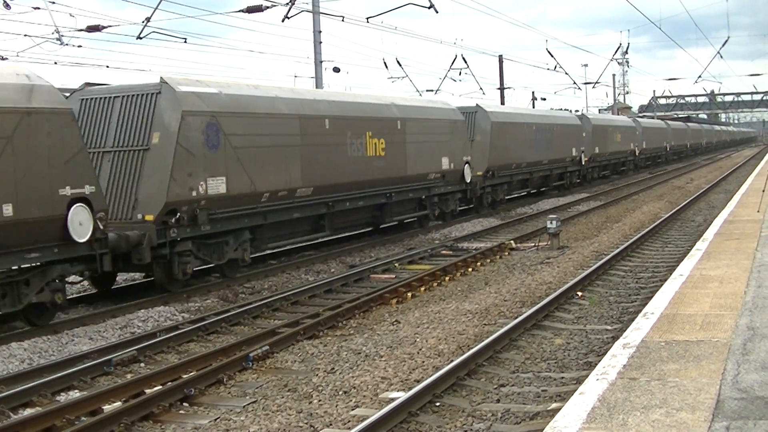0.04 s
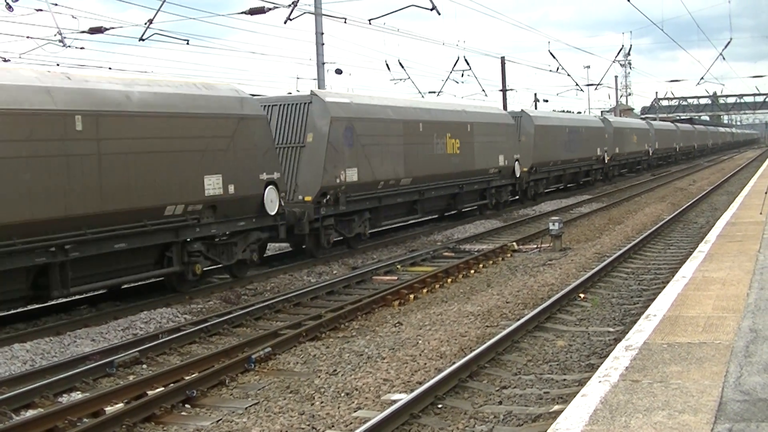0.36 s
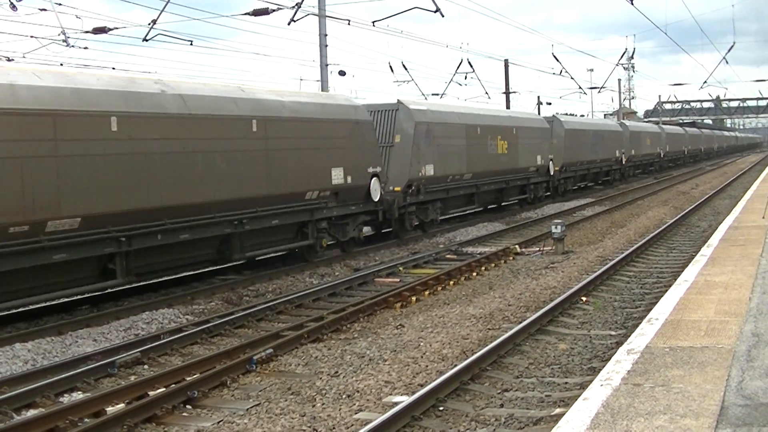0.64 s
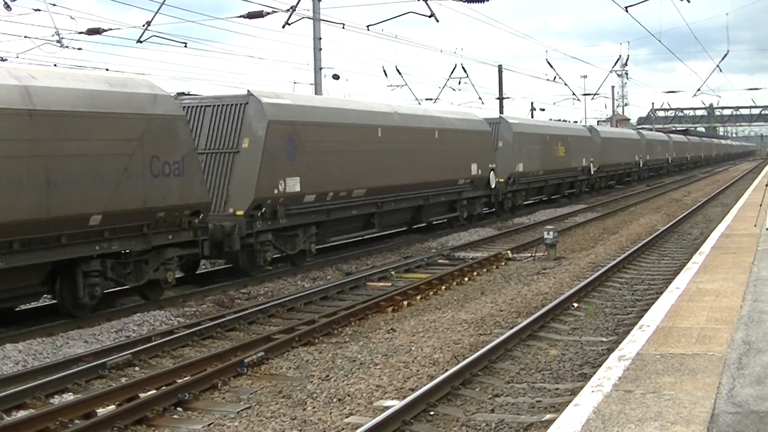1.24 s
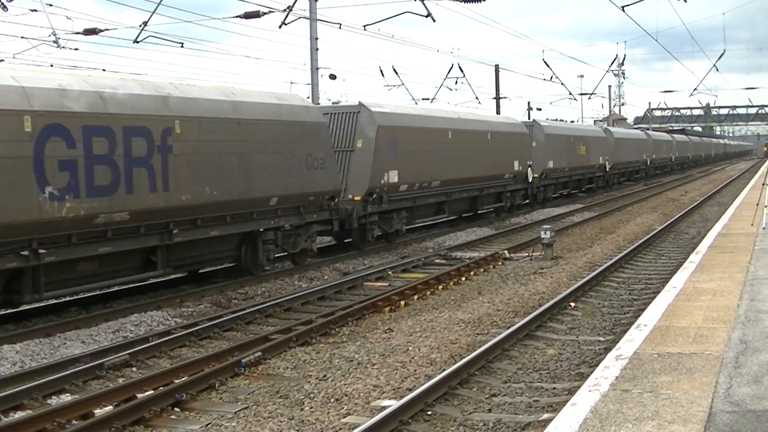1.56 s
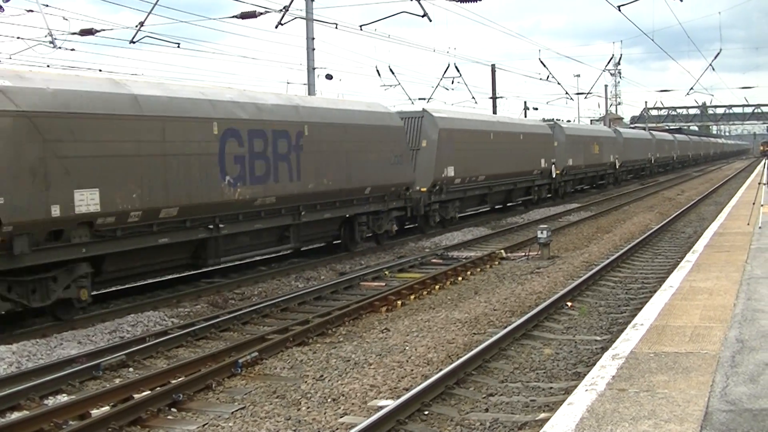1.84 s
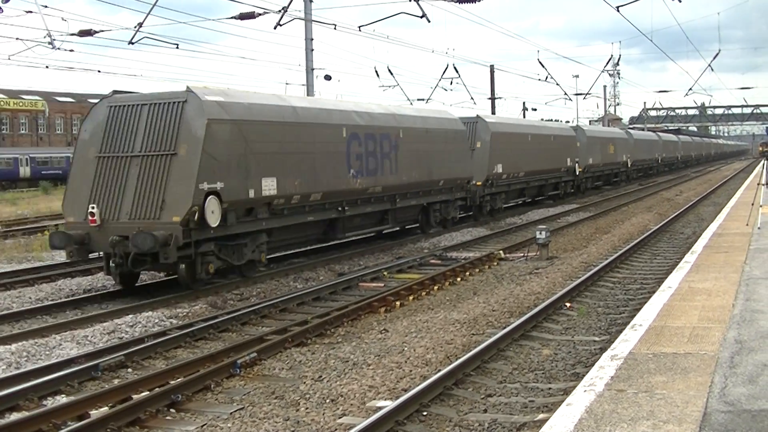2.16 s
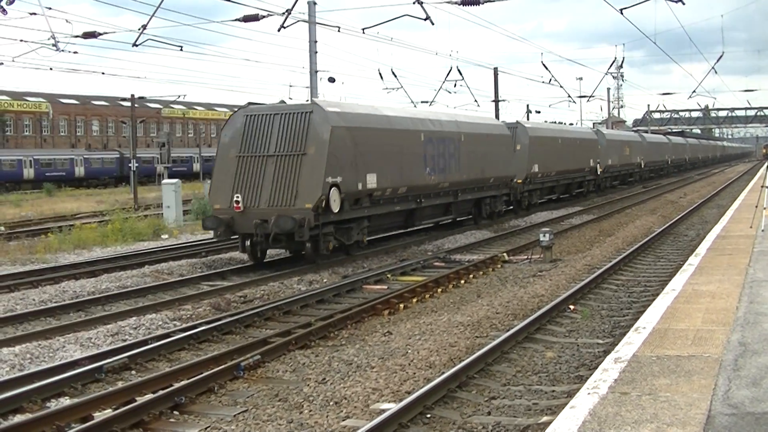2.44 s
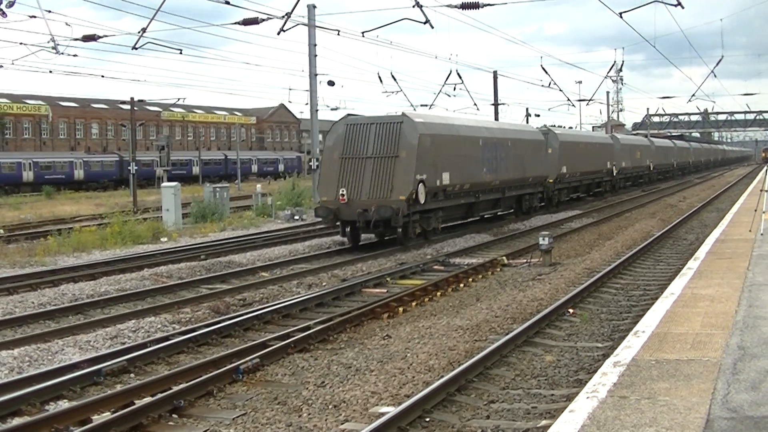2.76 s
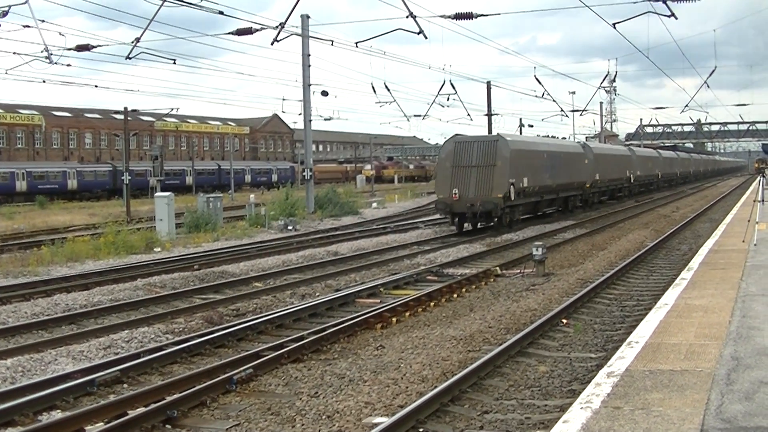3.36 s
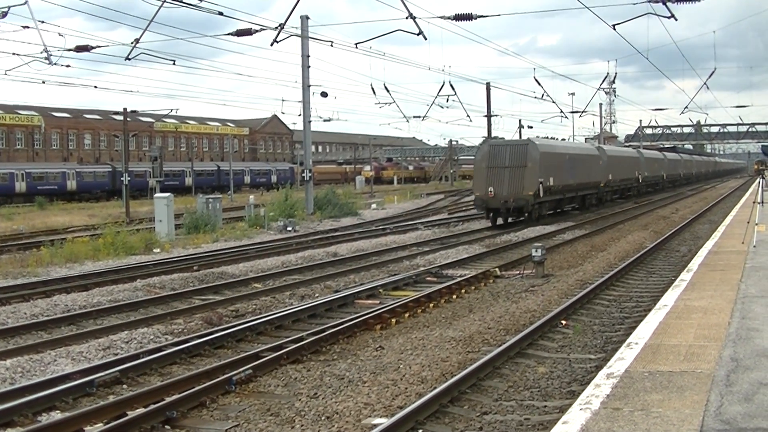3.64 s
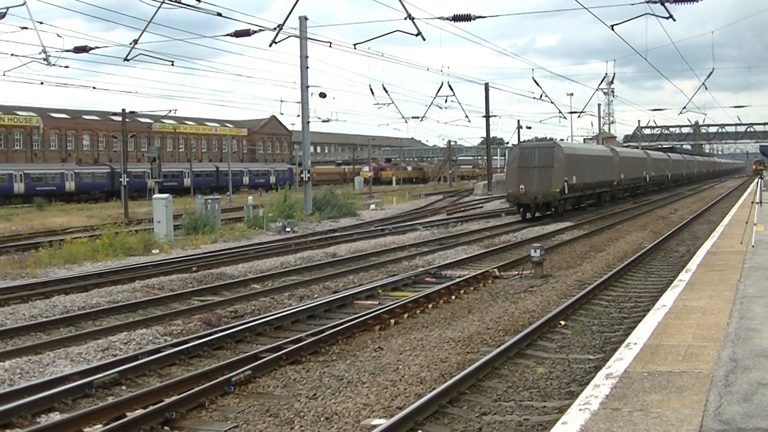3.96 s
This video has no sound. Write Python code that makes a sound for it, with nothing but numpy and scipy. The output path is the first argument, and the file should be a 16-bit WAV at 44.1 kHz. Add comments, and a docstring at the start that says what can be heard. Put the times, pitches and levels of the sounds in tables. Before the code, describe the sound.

Freight wagons rumble by with a howling, thumping wheel and clanks, then recede.

```python
"""The last hopper wagons of a freight train roll past a station platform and draw away.
At first rough wheels roar and hiss on the rails, and one worn wheel howls and thumps once a turn.
As the last bogies pass, couplings clank, flanges scrape, wagon bodies thud and each set of ringing
wheels sinks in pitch. Then the howl dies out, the rolling fades under a few late clanks and scrapes,
and a light breeze comes up."""
import sys
import numpy as np
from scipy import signal
from scipy.fft import rfft, irfft
from scipy.io import wavfile

SR = 44100
rng = np.random.default_rng(int(sys.argv[2]) if len(sys.argv) > 2 else 0)


def generate_wav(signal):
    """Clip the signal to [-1, 1] and save it as 16-bit WAV at the path in sys.argv[1]."""
    frames = np.transpose(np.atleast_2d(signal))
    scaled = np.clip(frames, -1, 1) * 32767
    pcm = np.round(scaled).astype(np.int16)
    wavfile.write(sys.argv[1], SR, pcm)


N = 176400
TIME = np.arange(N) / SR
THUMP_RISE_S, THUMP_FADE_S = 0.01, 0.017


def rolling():
    """Rough treads shake wagons, rails and sleepers, and hiss at the contact."""
    # Tone of the body rumble, track roar, steel-on-steel hiss and fine sizzle.
    # Each row: frequency in Hz, relative level in dB.
    rumble_tone = [(20, -41), (60, -56), (100, -19), (140, -14.5), (190, -0.5), (260, 0), (310, 7),
                   (380, -3), (700, -4), (2000, -60)]
    roar_tone = [(200, -40), (370, -15.5), (480, 0), (830, 1), (930, 2.5), (1130, 2), (1400, -9),
                 (1650, -5), (2000, -19), (3500, -54)]
    hiss_tone = [(700, -47), (1500, 1), (1850, 2), (2030, -2), (2320, -0.5), (2570, -2.5), (3000, 2),
                 (3450, -5.5), (3900, -7), (4250, -9), (5600, -13.5), (7000, -21), (12000, -58)]
    sizzle_tone = [(2500, -23.5), (5000, 0), (7200, 0.5), (9000, -4.5), (11500, -8.5), (13000, -18),
                   (15500, -30)]
    # Faders for the same four layers. Each row: time in seconds, level in dB.
    rumble_level = [(0, -42), (1.2, -43), (2.3, -41.5), (3, -47), (4, -49.5)]
    roar_level = [(0, -16.5), (.3, -19.5), (1, -20), (1.5, -22), (2, -22), (2.45, -24), (2.9, -25),
                  (3.3, -25.5), (4, -27.5)]
    hiss_level = [(0, -21.5), (.3, -21.5), (.55, -23), (1.6, -24), (2.25, -25.5), (2.5, -28.5), (3.35, -30),
                  (3.65, -31), (4, -30.5)]
    sizzle_level = [(0, -34.5), (.3, -35), (.6, -36.5), (1.4, -36), (2.3, -34.5), (2.45, -38.5),
                    (3.4, -40.5), (3.7, -46)]
    rumble = noise(rumble_tone) * amp(curve(rumble_level)) * flutter(rate_hz=14, depth_db=2)
    roar = noise(roar_tone) * amp(curve(roar_level)) * flutter(rate_hz=11.7, depth_db=0.63)
    hiss = treads(hiss_tone) * amp(curve(hiss_level))
    sizzle = treads(sizzle_tone) * amp(curve(sizzle_level))
    return rumble + roar + (hiss + sizzle) * flutter(rate_hz=10.3, depth_db=0.5)


def treads(tone):
    """Steely hiss whose ring crossfades from one set of wheels to the next."""
    fade = np.pi / 2 * np.arange(N) / N
    return np.cos(fade) * steel(noise(tone)) + np.sin(fade) * steel(noise(tone))


def steel(x, fade_s=0.01, ring_db=-5):
    """Adds the ring of countless close steel modes."""
    t = np.arange(SR // 8) / SR
    ring = rng.standard_normal(len(t)) * np.exp(-t / fade_s)
    return unit(x + amp(ring_db) * unit(irfft(rfft(x) * rfft(ring, N), N)))


def worn_wheel(half_width_hz=50.5, low_ratio=0.87, low_db=-14, surge=0.47):
    """A rough, sinking two-note howl that surges with each thump of the flat spot."""
    # The howl's path. Each row: time in seconds, upper pitch in Hz, level in dB.
    howl_path = [(0, 831, -26), (.25, 818.4, -23), (.42, 790, -18), (.74, 800, -14.5), (.88, 741, -17),
                 (1.04, 743.6, -18.5), (1.16, 793.5, -25.5), (1.45, 794, -25), (2.6, 753, -52)]
    # Tone of the thump. Each row: frequency in Hz, relative level in dB.
    thump_tone = [(70, -55), (380, -10.5), (600, 0.5), (800, 2.5), (1100, -1), (2000, -24), (12000, -68)]
    # Strength of the thumps. Each row: time in seconds, level in dB.
    thump_level = [(0, -19), (.6, -20.5), (1.42, -16.5), (1.58, -23), (1.75, -17.5), (2.4, -30), (4, -25.5)]
    hz, strikes = curve(howl_path), flat_spot()
    notes = ringing(hz, half_width_hz) + amp(low_db) * ringing(hz * low_ratio, half_width_hz)
    howl = unit(notes * (1 + surge * strikes)) * amp(curve(howl_path, column=2))
    thumps = noise(thump_tone) * strikes * amp(curve(thump_level))
    return howl + thumps


def flat_spot(first_s=0.1143, turn_s=0.1447):
    """Envelope of the flat spot's blows, one on every turn of the worn wheel."""
    return sum(blow(start, THUMP_RISE_S, THUMP_FADE_S) for start in np.arange(first_s, N / SR, turn_s))


def wheels(speed_m_per_s=19, track_away_m=8, sound_m_per_s=343):
    """The nearest bogies ring loudest; their modes sink by Doppler shift as they recede."""
    # Wheel modes as heard from far behind. Each row: pitch in Hz, half width in Hz, relative level in dB.
    modes = [(1790, 58, -2), (2211, 86, -1), (2860, 42, -2), (3790, 41, -11), (4570, 73, -10),
             (5420, 120, -14)]
    # Sets of bogies. Each row: time abreast of the listener in seconds, relative level in dB.
    bogies = [(-1.2, 3.5), (-.15, 4), (.85, 1.5), (1.55, -2.5)]
    # Fader for all the ringing. Each row: time in seconds, level in dB.
    ring_level = [(0, -26.5), (.3, -24.5), (1, -28.5), (1.3, -25.5), (2.05, -29), (2.5, -28), (3, -34.5),
                  (3.3, -30.5), (3.65, -39), (4, -34.5)]
    ring, power = np.zeros(N), np.zeros(N)
    for abreast, bogie_db in bogies:
        along = speed_m_per_s * (TIME - abreast)
        distance = np.hypot(along, track_away_m)
        doppler = (sound_m_per_s + speed_m_per_s) / (sound_m_per_s + speed_m_per_s * along / distance)
        gain = amp(bogie_db) / distance
        ring += gain * sum(amp(db) * ringing(hz * doppler, width) for hz, width, db in modes)
        power += gain ** 2
    return unit(ring / np.sqrt(power)) * amp(curve(ring_level))  # distance sets only the blend


def rails(surge=0.56):
    """The track hums under the passing wheels, throbbing unevenly as the flat spot strikes it."""
    # The track's resonances. Each row: pitch in Hz, half width in Hz, relative level in dB.
    modes = [(611, 30.6, 0.5), (1221, 24, -7.5), (1535, 27, -6.5)]
    # Fader for the hum. Each row: time in seconds, level in dB.
    hum_level = [(0, -27.5), (.9, -23), (1.5, -26.5), (2, -22.5), (2.7, -28.5), (3.3, -29.5), (4, -31)]
    hum = sum(amp(db) * ringing(hz, width) for hz, width, db in modes)
    throb = (1 + surge * flat_spot()) * flutter(rate_hz=5.5, depth_db=2)
    return unit(hum * throb) * amp(curve(hum_level))


def clanks(rise_s=0.0032, crack_fade_s=0.0074, ring_fade_s=0.014):
    """Couplings and bogie frames knock: a crack and one short ring."""
    # The knocks. Each row: start in seconds, crack level in dB, ring pitch in Hz, ring level in dB.
    knocks = [(.547, -17, 800, -13), (.762, -20, 1000, -13.5), (.838, -16, 835, -14),
              (0.981, -17, 660, -17), (1.123, -16, 1490, -14.5), (1.266, -12.5, 1210, -19),
              (1.414, -20, 830, -16), (1.869, -27, 670, -17.5), (2.018, -25, 1020, -17.5),
              (2.968, -23.5, 1170, -31), (3.036, -29, 610, -20.5), (3.089, -26, 530, -22.5)]
    # Tone of the crack. Each row: frequency in Hz, relative level in dB.
    crack_tone = [(80, -53), (600, 1.5), (1600, 6), (3000, -7), (14000, -67)]
    crack, out = noise(crack_tone), np.zeros(N)
    for start, crack_db, hz, ring_db in knocks:
        ring = unit(np.sin(2 * np.pi * (hz * TIME + rng.random())))
        out += amp(crack_db) * blow(start, rise_s, crack_fade_s) * crack
        out += amp(ring_db) * blow(start, rise_s, ring_fade_s) * ring
    return out


def flanges():
    """A flange brushes the rail: a gritty swell of steely hiss with a brief squeal in it."""
    # The scrapes. Each row: middle in seconds, half length in seconds, hiss level in dB,
    # squeal pitch in Hz, squeal level in dB.
    scrapes = [(0.184, 0.017, -31, 7400, -32.5), (1.077, .03, -30.5, 7200, -46),
               (1.235, 0.029, -30, 10200, -47), (1.528, 0.019, -33, 7450, -38.5),
               (3.318, 0.029, -34.5, 6900, -42), (3.85, 0.009, -48, 4480, -34)]
    # Tone of their hiss. Each row: frequency in Hz, relative level in dB.
    scrape_tone = [(2000, -13.5), (4500, 4), (7500, 1), (10500, -5), (12000, -14), (13500, -20),
                   (15500, -22)]
    grit, out = flutter(rate_hz=130, depth_db=2.3), np.zeros(N)
    for middle, half, hiss_db, hz, squeal_db in scrapes:
        hiss = amp(hiss_db) * grit * steel(noise(scrape_tone))
        squeal = amp(squeal_db) * ringing(hz, half_width_hz=170)
        out += swell(middle, half) * (hiss + squeal)
    return out


def singing():
    """Slipping treads make single wheel modes sing thinly."""
    # The sung notes. Each row: middle in seconds, half length in seconds, pitch in Hz, level in dB.
    notes = [(1.31, .2, 3000, -34), (1.265, 0.079, 3820, -35.5), (1.2, .55, 2290, -32),
             (1.85, 0.35, 5400, -43), (2.15, 0.28, 1247, -32.5), (2.08, .3, 2100, -34.5),
             (2.2, 0.29, 2870, -32), (3.25, 0.29, 4590, -43.5), (3.4, 0.25, 6870, -50),
             (3.499, 0.032, 1550, -36)]
    return sum(amp(db) * swell(middle, half) * ringing(hz, half_width_hz=17.5)
               for middle, half, hz, db in notes)


def thuds():
    """Hollow wagon bodies bump on their springs."""
    # The bumps. Each row: start in seconds, level before the last filter in dB.
    bumps = [(.475, -34), (1.13, -31), (1.352, -34), (2.29, -34)]
    # Dull body filter, used before and after the envelope. Each row: frequency in Hz, gain in dB.
    body_tone = [(70, -59), (170, -0.5), (320, -1), (700, -24.5)]
    envelope = sum(amp(db) * blow(start, THUMP_RISE_S, fade_s=0.016) for start, db in bumps)
    return colour(noise(body_tone) * envelope, body_tone)


def station_scatter(train, fade_s=0.017):
    """The station throws the train's sound back from the sides as a faint, short wash."""
    # Tone of the wash. Each row: frequency in Hz, gain in dB.
    wash_tone = [(60, -6), (200, -13), (380, -23.5), (2380, -23.5), (4400, -14.5), (8120, -25), (15000, -8)]
    # Its fader as the train draws away. Each row: time in seconds, gain in dB.
    wash_level = [(0, 5), (1.5, -2), (4, -4.5)]
    t = np.arange(SR // 3) / SR
    echoes = rng.standard_normal(len(t)) * t * np.exp(-t / fade_s)
    wash = signal.fftconvolve(train, echoes / np.linalg.norm(echoes))[:N]
    return colour(wash, wash_tone) * amp(curve(wash_level))


def breeze(apart_db=-5.5):
    """A rising breeze buffets the microphone: one shared rumble, and a weaker one on each side."""
    # Tone of the buffeting. Each row: frequency in Hz, relative level in dB.
    wind_tone = [(20, -12), (60, -7), (125, 5.5), (200, 3), (500, -43), (2000, -70)]
    # Fader for the breeze. Each row: time in seconds, level in dB.
    wind_level = [(0, -73), (3.2, -65), (3.6, -55.5), (4, -47)]
    shared = noise(wind_tone)
    apart = np.array([noise(wind_tone), noise(wind_tone)])
    return (shared + amp(apart_db) * apart) * amp(curve(wind_level))


def amp(db):
    """Decibels to gain."""
    return 10 ** (np.asarray(db) / 20)


def unit(x):
    """Scales to rms 1."""
    return x / np.sqrt(np.mean(x ** 2) + 1e-20)


def curve(rows, column=1):
    """One column of a time table, at every sample."""
    rows = np.array(rows)
    return np.interp(TIME, rows[:, 0], rows[:, column])


def colour(x, tone):
    """Equalises by a curve of (Hz, dB) points."""
    hz, db = np.transpose(tone)
    log_hz = np.log(np.fft.rfftfreq(N, 1 / SR) + 1)
    return irfft(rfft(x) * amp(np.interp(log_hz, np.log(hz), db)), N)


def noise(tone):
    """Noise of rms 1 with the given tone."""
    return unit(colour(rng.standard_normal(N), tone))


def flutter(rate_hz, depth_db):
    """A random gain that wanders at around the given rate."""
    ratio = np.fft.rfftfreq(N, 1 / SR) / rate_hz
    wander = irfft(rfft(rng.standard_normal(N)) * ratio ** 0.5 * np.exp(-ratio ** 2), N)
    return amp(depth_db * unit(wander))


def ringing(hz, half_width_hz):
    """A resonance kept ringing by random forces; its pitch may move."""
    offset = np.fft.fftfreq(N, 1 / SR) / half_width_hz
    peak = np.exp(-(offset / 5) ** 2) / (1 + offset ** 2)
    forces = rng.standard_normal(N) + 1j * rng.standard_normal(N)
    sway = np.fft.ifft(np.fft.fft(forces) * peak)
    phase = 2 * np.pi * np.cumsum(hz * np.ones(N)) / SR
    return unit((sway * np.exp(1j * phase)).real)


def blow(start, rise_s, fade_s):
    """Envelope of a blow: straight rise, exponential fade."""
    t = TIME - start
    return np.clip(t / rise_s, 0, 1) * np.exp(-np.maximum(t - rise_s, 0) / fade_s)


def swell(middle_s, half_s):
    """A bell-shaped envelope."""
    return np.exp(-0.5 * ((TIME - middle_s) / half_s) ** 2)


def scene():
    """The train in the middle, the station's scatter at the sides, the breeze underneath."""
    train = rolling() + rails() + wheels() + singing() + worn_wheel() + clanks() + thuds() + flanges()
    side = station_scatter(train)
    return np.array([train + side, train - side]) + breeze()


def record(dry):
    """A steep low-pass takes off the very top of the treble."""
    edge_hz = 15680
    low_pass = signal.firwin(801, edge_hz, window=("kaiser", 9), fs=SR)
    return signal.oaconvolve(dry, low_pass[None], "same")


dry = scene()
out = record(dry)
generate_wav(out)
```